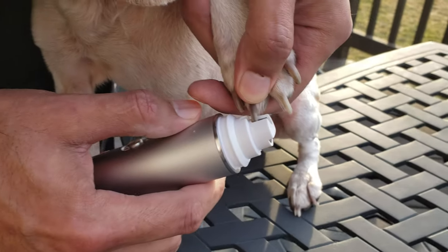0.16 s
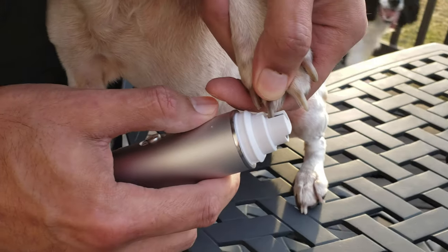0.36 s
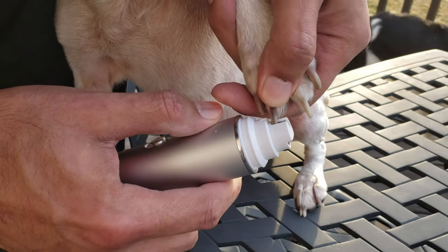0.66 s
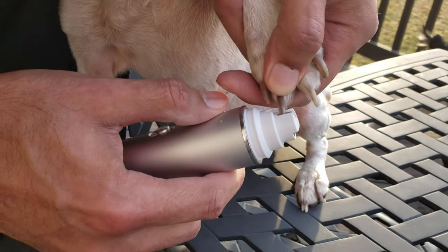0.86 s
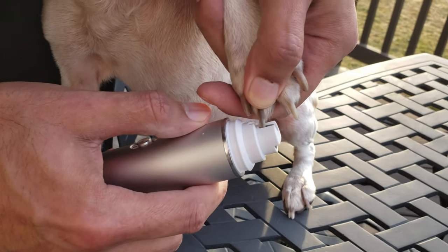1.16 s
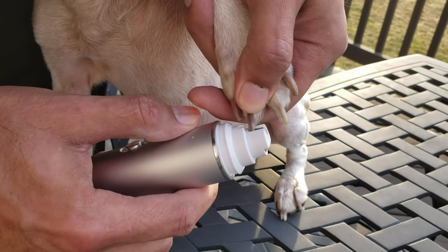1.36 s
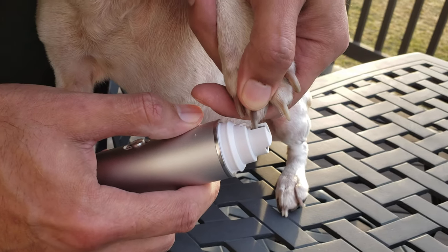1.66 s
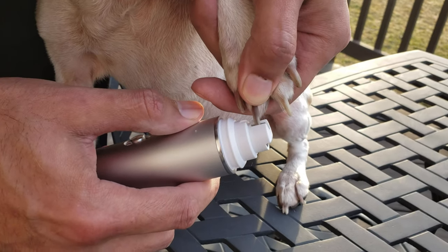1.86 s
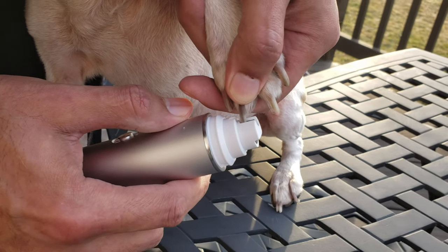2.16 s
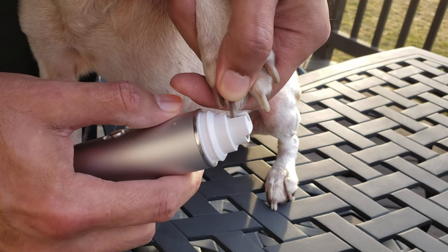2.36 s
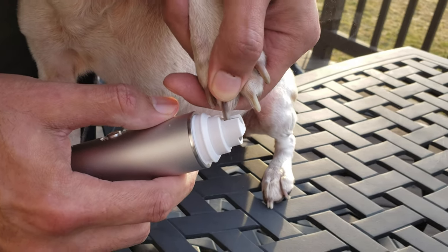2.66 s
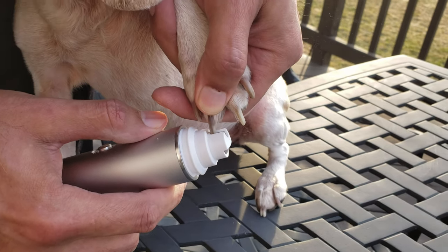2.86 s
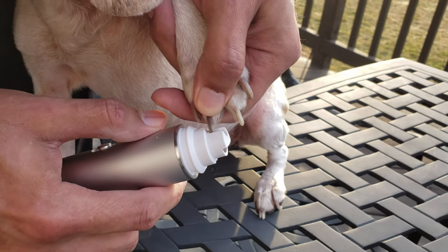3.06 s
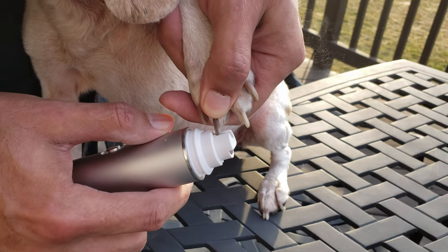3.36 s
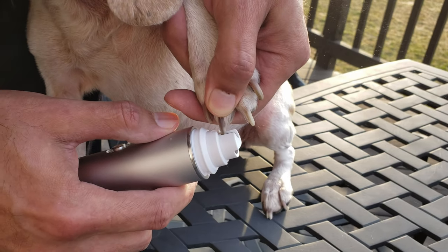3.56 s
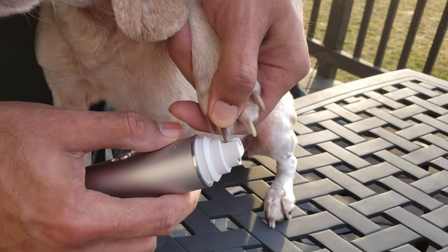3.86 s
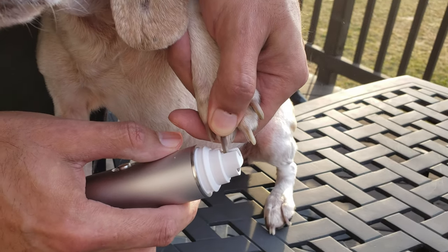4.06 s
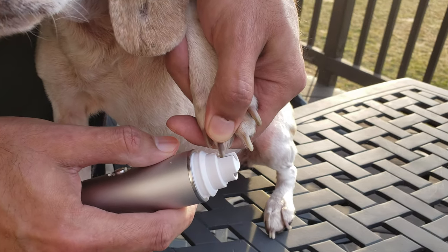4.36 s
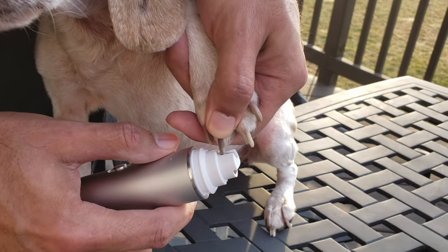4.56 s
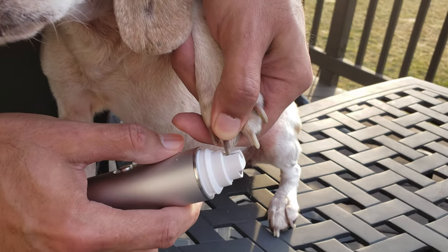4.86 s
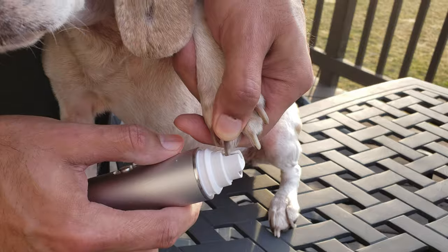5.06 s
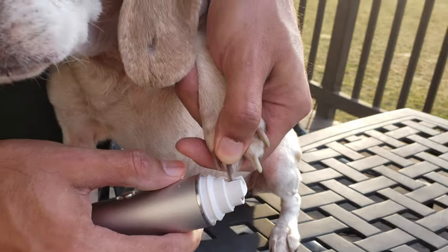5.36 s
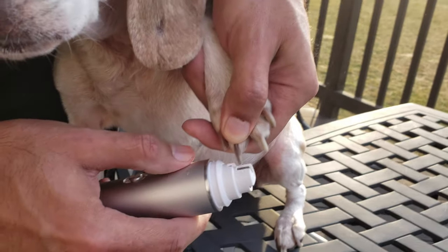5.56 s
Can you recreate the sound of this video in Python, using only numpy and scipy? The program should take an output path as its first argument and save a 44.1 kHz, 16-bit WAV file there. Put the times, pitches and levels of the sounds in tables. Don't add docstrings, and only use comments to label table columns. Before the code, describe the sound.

Bright, dense abrasive hiss of a rotary nail grinder, speeding and slowing with pressure, over faint outdoor rumble and low paw thumps.

```python
import sys
import numpy as np
from scipy import signal
from scipy.fft import rfft, irfft, next_fast_len
from scipy.io import wavfile
from scipy.ndimage import uniform_filter1d, map_coordinates

SR = 44100
rng = np.random.default_rng(int(sys.argv[2]) if len(sys.argv) > 2 else 0)


def convert_level_to_amplitude(level_db):
    exponent = np.asarray(level_db, float) / 20
    return 10 ** exponent


def to_wav(s):
    ch = np.atleast_2d(s).T
    pcm = np.round(np.clip(ch, -1, 1) * 32767)
    wavfile.write(sys.argv[1], SR, pcm.astype(np.int16))


N = 251370
T = np.arange(N) / SR
FFT_SIZE = next_fast_len(N + 8192)
HZ = np.fft.rfftfreq(FFT_SIZE, 1 / SR)
RIGHT_LATE_S = .00018


def evened(x):
    return x / np.sqrt(np.mean(x ** 2) + 1e-20)


def read(points, hz):
    f, value = np.transpose(points)
    return np.interp(np.log(hz + 1), np.log(f + 1), value)


def wander(hz):
    return evened(signal.lfilter(*signal.butter(2, hz, fs=SR), rng.standard_normal(N)))


def heard(spectrum):
    return irfft(spectrum, FFT_SIZE)[..., :N]


def partly_alike(shared, other, same):
    return same * shared + np.sqrt(1 - same ** 2) * other


def shaft():
    # slowest moment in s, its speed in turns per s, fastest moment in s, its speed in turns per s.
    strokes = [(0.36, 49, .64, 71), (.72, 71, .98, 88), (1.04, 84.5, 1.1, 93), (1.46, 45, 1.81, 100),
               (1.86, 96, 1.93, 110), (2.38, 47, 2.73, 106), (2.74, 106, 2.87, 119), (3.2, 50, 3.52, 116),
               (3.575, 108, 3.64, 110), (3.9, 53, 4.12, 112), (4.36, 48, 4.52, 100), (4.63, 56, 4.74, 95),
               (5.05, 52, 5.28, 56), (5.29, 56, 5.47, 118), (5.48, 118, 5.75, 124)]
    s, rps = np.reshape(strokes, (-1, 2)).T
    count = np.arange(len(s))
    step = np.interp(T, s, count)
    smooth_step = step // 1 + np.sin(np.pi / 2 * (step % 1)) ** 2
    return np.interp(smooth_step, count, rps)


def contact():
    # landing in s, time away in s, time taken to leave in s, depth in dB, bite on landing in dB.
    lifts = [(.485, 0.04, .03, -1, 1.5), (1.091, 0.12, 0.085, -2.5, 2), (1.785, 0.057, 0.043, 2.5, 2),
             (1.92, 0.051, .04, -1.5, 2), (2.7, 0.086, 0.065, -1.5, 2.5), (2.896, 0.19, 0.087, -9.5, 5),
             (3.439, 0.06, 0.038, -9, -1.5), (3.49, 0.044, 0.042, -9.5, 3.5), (3.64, 0.072, .06, -0.5, 3),
             (3.96, 0.18, 0.053, -2.5, 0), (4.112, 0.13, 0.11, -8, 1), (4.409, 0.15, 0.094, -2.5, 0),
             (4.514, 0.062, 0.03, -7.5, 5.5), (4.747, 0.069, 0.053, -6.5, 6),
             (5.45, 0.098, 0.033, -15, -17.5), (5.53, 0.069, 0.041, -12, -18), (5.9, 0.397, .04, -27, -2.5)]
    land_s, bite_s, settle_s = .01, .13, .05
    lift_db, bite_db, seated = np.zeros(N), np.zeros(N), np.zeros(N)
    for land, away, leave, depth_db, hit_db in lifts:
        leaving = np.clip((T - land + away) / leave, 0, 1)
        lift_db += depth_db * leaving * np.clip((land - T) / land_s, 0, 1)
        since = np.maximum(T - land, 0)
        bite_db += hit_db * np.clip((T - land) / land_s + 1, 0, 1) * np.exp(-since / bite_s)
        seated += max(hit_db, 0) / 5 * (since / settle_s) ** 2 * np.exp(-since / settle_s)
    return lift_db, bite_db, seated


def grit(turns, grazing, spread_db=2.5, catch_db=4.5):
    stone = signal.lfilter([1], [1, -.92], rng.standard_normal((700, 256)), axis=0).ravel()
    again = evened(map_coordinates(stone, [turns * 256], order=3))
    again_share = .25 + .6 * grazing
    bite = 3.2 * grazing ** 1.4
    touch = np.exp(bite * np.cos(2 * np.pi * turns)) / np.sqrt(np.i0(2 * bite))
    catches = convert_level_to_amplitude(-.86 * grazing * catch_db * wander(190.) + .5 * wander(8.7))
    grain_size = np.minimum(rng.exponential(1, (2, N)), 6)
    grains = rng.standard_normal((2, N)) * convert_level_to_amplitude(spread_db * grain_size)
    rubbing = np.sqrt(1 - again_share) * evened(grains)
    rubbing[0] += np.sqrt(again_share) * again
    return evened(rubbing * touch * catches)


def path(slope, rings):
    hz = np.fft.rfftfreq(4096, 1 / SR)
    power = convert_level_to_amplitude(read(slope, hz)) ** 2
    for f, width, db in rings:
        power = power + convert_level_to_amplitude(db) ** 2 / (1 + (2 * (hz - f) / width) ** 2) ** 2
    log_gain = np.log(np.r_[power, power[-2:0:-1]]) / 2
    taps = np.fft.ifft(np.exp(np.conj(signal.hilbert(log_gain)))).real
    return rfft(taps[:2048], FFT_SIZE)


def at_microphones(drives):
    # frequency in Hz, gain in dB.
    slope_left, slope_right = [(300, -34.5), (900, -41.5), (1300, -48.5), (1950, -41.5), (2600, -24),
                               (4250, -36), (5500, -15), (7000, -12), (8500, -17), (10000, -21.5),
                               (12000, -26.5), (15800, -20.5)], [(300, -32), (900, -41.5), (1500, -41.5), (2500, -29),
                                                   (4200, -33), (6000, -31.5), (6900, -24), (8200, -29),
                                                   (9500, -22), (12500, -32), (15800, -28)]
    # frequency in Hz, width in Hz, gain in dB.
    rings_left, rings_right = [(1597, 335, -13.5), (2270, 400, -19.5), (3136, 760, -20), (3752, 208, -15.5),
                               (5014, 67, -15), (7030, 790, -4.5), (7537, 466, 1), (10850, 170, -12.5),
                               (12350, 550, -11.5), (14530, 670, -11)], [(1320, 51, -30), (2220, 220, -47.5), (3335, 173, -15),
                                                   (3794, 54, -15), (5355, 144, -11), (7720, 220, -29),
                                                   (9310, 390, -12.5), (11300, 400, -35),
                                                   (11570, 350, -6.5), (13380, 130, -9)]
    # frequency in Hz, likeness from 0 to 1.
    likeness = [(800, .6), (1300, .82), (3300, .82), (7700, .8), (10000, .75), (13000, .6)]
    same = np.clip(read(likeness, HZ), 0, 1)
    late = np.exp(-2j * np.pi * HZ * RIGHT_LATE_S)
    left, right = path(slope_left, rings_left), late * path(slope_right, rings_right)
    ears = []
    for shared, other in rfft(drives, FFT_SIZE):
        ears.append(np.array([shared * left, partly_alike(shared, other, same) * right]))
    return ears


def whine(turns):
    order_db = [-14, -11, -9, -8, -4, 0, -7, -5, -3, -2, -4, -7, -8, -7, -4, -1, 0, -3, -7, -8, -6, -4, -3,
                -5, -7, -8, -8, -9]
    slip = wander(12.)
    jittery_turns = turns + .002 * slip
    song = np.zeros(N)
    for k, db in enumerate(order_db, 8):
        flutter_db = 1.8 * np.roll(slip, 9000 * k)
        song += convert_level_to_amplitude(db + flutter_db) * np.cos(2 * np.pi * (k * jittery_turns + .35 * rng.random()))
    return evened(song)


def motor(turns, eased, press_db, lift_db):
    pan_db = 12
    song = signal.lfilter(*signal.butter(2, [1450., 3700.], "band", fs=SR), whine(turns))
    db = -57.5 + 17 * np.sqrt(eased) + .8 * (press_db - press_db.mean()) + .6 * lift_db
    song = evened(song) * convert_level_to_amplitude(db)
    return np.array([song, convert_level_to_amplitude(-pan_db) * np.roll(song, round(RIGHT_LATE_S * SR))])


def shifting(x, patchy_db=2.1):
    z = signal.stft(x, nperseg=256)[2]
    patches = uniform_filter1d(rng.standard_normal(z.shape[1:]), size=6, axis=0)
    patches = uniform_filter1d(patches, size=70, axis=1)
    patches = evened(uniform_filter1d(patches, size=40, axis=1))
    return signal.istft(z * convert_level_to_amplitude(patchy_db * patches), nperseg=256)[1][:, :N]


def grinder():
    # time in s, grit level in dB.
    pressure = [(0, -32), (.33, -35), (.53, -39.5), (.78, -29.5), (1.06, -28.5), (1.13, -28.5), (1.55, -33),
                (1.99, -26.5), (2.55, -33), (2.95, -30), (3.28, -35.5), (3.6, -32), (3.7, -29.5),
                (3.8, -31), (4.22, -30.5), (4.9, -34.5), (5.25, -36), (5.5, -22)]
    seams_hz = [2620, 4440, 8630]
    # level in dB, dB per dB of pressure, dB per dB of lift, dB added when running free.
    parts = [
        (-21, 0, 0.46, 8.5),
        (-12.5, -0.13, 1, 2),
        (0.05, -0.1, 0.2, -0.6),
        (-1, -0.14, 0.42, -3.5),
    ]
    loaded_rps, free_rps = 52, 112
    speed = shaft()
    turns = np.cumsum(speed) / SR
    lift_db, bite_db, seated = contact()
    eased = np.clip((speed - loaded_rps) / (free_rps - loaded_rps), 0, 1)
    touching = .3 + .7 * convert_level_to_amplitude(lift_db)
    grazing = np.clip(.05 + .65 * eased ** 1.6 * touching * (1 - seated), 0, 1)
    drive = grit(turns, grazing)
    free = np.clip((speed - 45) / 55, .1, 1)
    low_drive = drive * np.sqrt(1 - .96 * free)
    ears, low_ears = at_microphones([drive, low_drive])

    press_db = np.interp(T, *np.transpose(pressure)) + bite_db
    below = [0]
    for f in seams_hz:
        below.append(1 / (1 + np.exp(np.clip((HZ - f) / 200, -50, 50))))
    below.append(1)
    out = 0
    for k, (db, by_press, by_lift, free_db) in enumerate(parts):
        part = heard((low_ears if k == 0 else ears) * (below[k + 1] - below[k]))
        own_db = db + by_press * (press_db - press_db.mean()) + by_lift * lift_db + free_db * eased
        out = out + convert_level_to_amplitude(press_db + lift_db + own_db) * part / np.std(part.mean(0))
    return shifting(out + motor(turns, eased, press_db, lift_db))


def table_echo(x):
    t = np.arange(2200) / SR
    scatter = rng.standard_normal((2, len(t))) * convert_level_to_amplitude(-60 * t / .035) * (t > .0012)
    scatter /= np.linalg.norm(scatter, axis=1, keepdims=True)
    return signal.oaconvolve(x, scatter, axes=1)[:, :N]


def yard():
    # frequency in Hz, level in dB per Hz.
    colour = [(25, -38), (45, -6), (68, -0.5), (100, -6), (150, -12.5), (300, -16), (700, -26), (1500, -16),
              (2900, -27), (4600, -19), (7500, -25), (9500, -25), (11500, -18), (13200, -14.5),
              (15500, -16)]
    # frequency in Hz, likeness of the two microphones from 0 to 1.
    likeness = [(60, 1), (150, 0.67), (300, 0.033), (2000, 0.81)]
    # frequency in Hz, left over right in dB.
    lean = [(60, 3), (300, 3), (900, 12), (1600, 14), (3000, 1), (5000, 1), (7000, 12), (8400, 8),
            (9800, 1)]
    a, b = rfft(rng.standard_normal((2, N)), FFT_SIZE)
    same, side = np.clip(read(likeness, HZ), 0, 1), convert_level_to_amplitude(read(lean, HZ) / 2)
    air = heard(np.array([a * side, partly_alike(a, b, same) / side]) * convert_level_to_amplitude(read(colour, HZ)))
    return convert_level_to_amplitude(-48 + wander(.27)) * evened(air)


def drone():
    # frequency in Hz, level at the start in dB, fade in dB per s.
    tones = [(195.5, -58, 2.6), (293.5, -57.5, 1.2), (392.5, -62.5, 3)]
    recede_db = 1.3 * T ** 2
    late_ms = np.maximum(1.8 - .5 * T, 0)
    clock = np.array([T, T - late_ms / 1000]) + .00006 * wander(2.)
    out = 0
    for hz, db, fade_db in tones:
        out = out + convert_level_to_amplitude(db - fade_db * T - recede_db) * np.sin(2 * np.pi * hz * clock)
    return out


def paws():
    # start in s, peak level in dB, pitch in Hz, left over right in dB, knock share.
    thuds = [(0.404, -44, 124, 0, 0.43), (1.158, -48, 200, 14, 0.18), (1.617, -43.5, 90.5, -1, 0.45),
             (2.299, -45, 248, 10, 0.28), (2.517, -48, 116, -6, 0.12), (3.319, -50, 310, 11, 0.17),
             (3.999, -36.5, 188.6, 9, 0.41), (4.292, -47.5, 216, 12, 0.11), (4.599, -46, 199, 9, 0.15),
             (5.043, -39, 106.5, 5, 0.23), (5.265, -43.5, 102, 4, 0.19), (5.358, -39, 91, 4, 0.15),
             (5.519, -38, 91, 4.5, 0.14)]
    t60_s, push_s = .13, .0033
    out, t = np.zeros((2, N + SR)), np.arange(SR // 3) / SR
    knocks = rng.standard_normal((len(thuds), len(t)))
    knocks = evened(signal.lfilter(*signal.butter(2, [300., 900.], "band", fs=SR), knocks))
    for (s, db, hz, pan_db, knock_share), knock in zip(thuds, knocks):
        ring = np.sin(2 * np.pi * hz * t) + .33 * np.sin(2 * np.pi * 1.43 * hz * t)
        ring += knock_share * knock * convert_level_to_amplitude(-700 * t)
        thud = ring * convert_level_to_amplitude(db - 60 * t / t60_s) * (1 - np.exp(-t / push_s))
        out[:, round(s * SR):][:, :len(t)] += thud * convert_level_to_amplitude(np.array([[pan_db / 2], [-pan_db / 2]]))
    return out[:, :N]


def scene():
    tool = grinder()
    return tool + convert_level_to_amplitude(-14) * table_echo(tool) + yard() + drone() + paws()


def top_cut(x):
    return signal.sosfilt(signal.butter(12, 17100, fs=SR, output="sos"), x)


def record(dry):
    low_pass = signal.firwin(511, 15950, window=("kaiser", 9), fs=SR)
    limited = signal.oaconvolve(dry, low_pass[None], "same", axes=1)
    return top_cut(limited)


dry = scene()
out = record(dry)
to_wav(out)
```